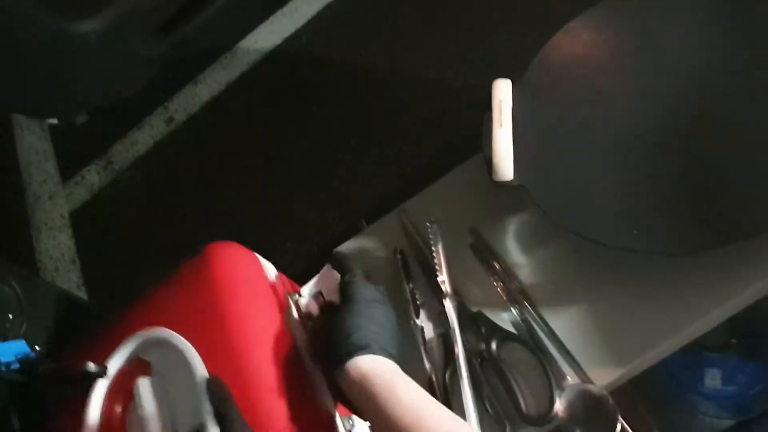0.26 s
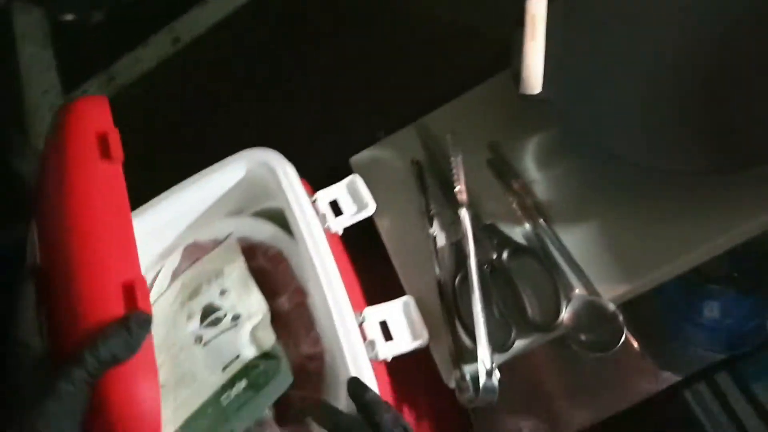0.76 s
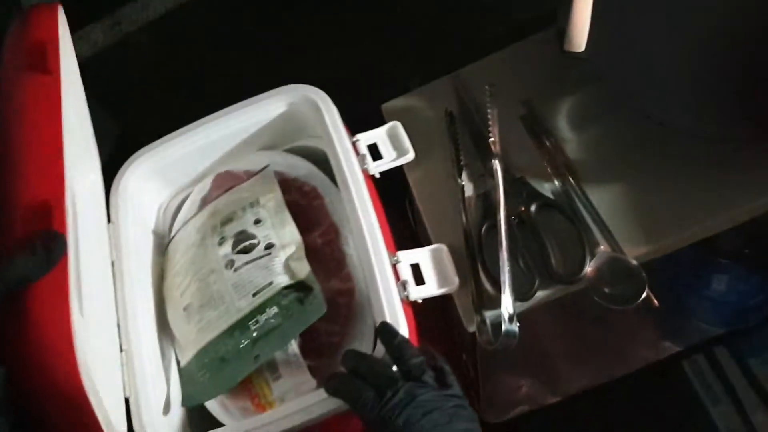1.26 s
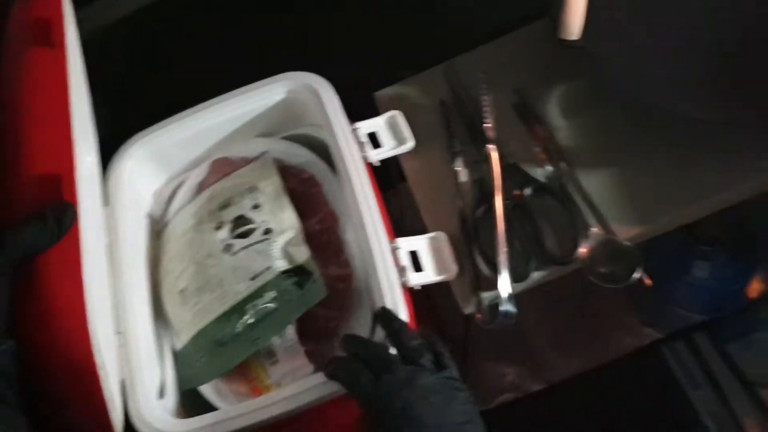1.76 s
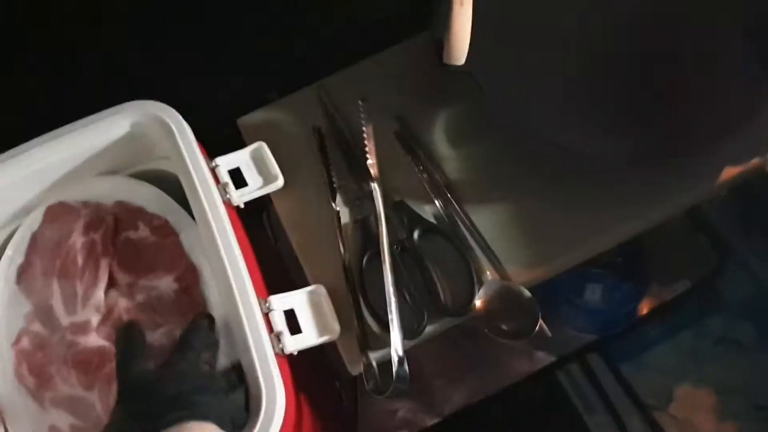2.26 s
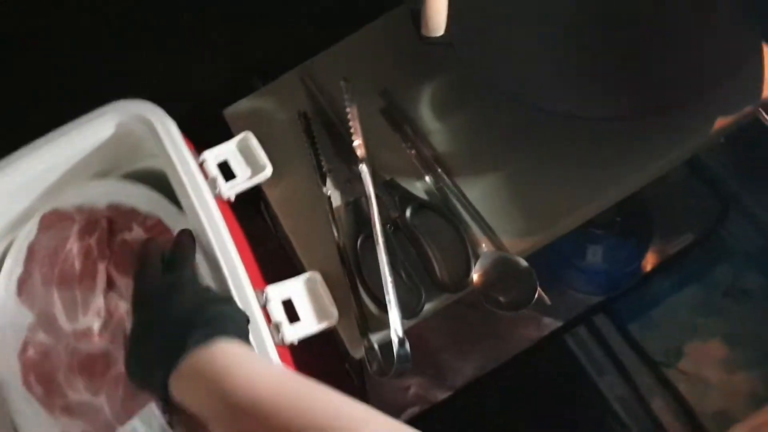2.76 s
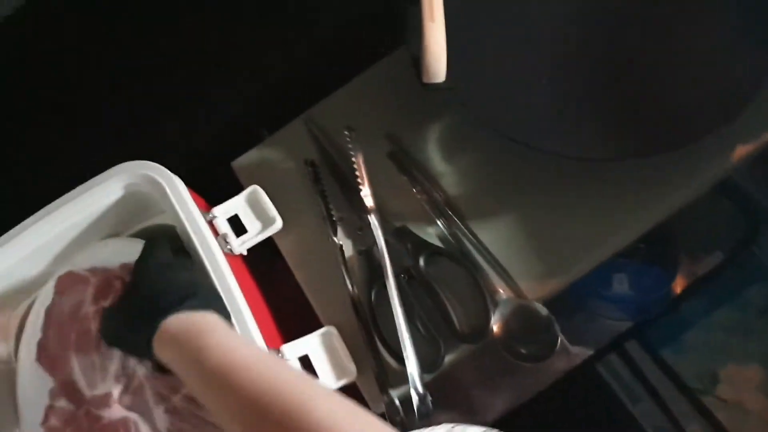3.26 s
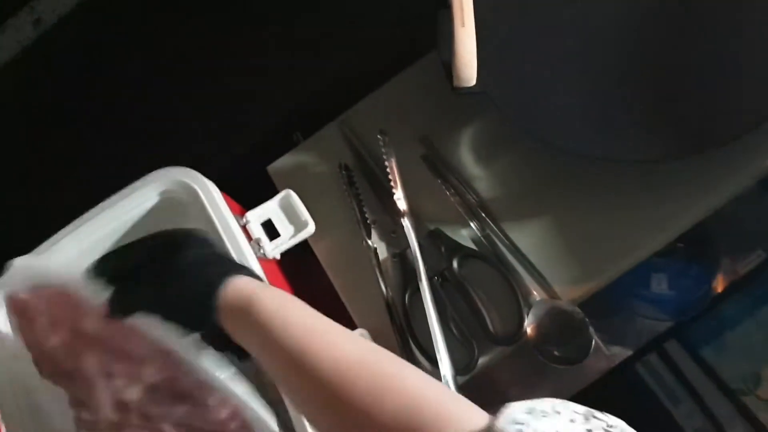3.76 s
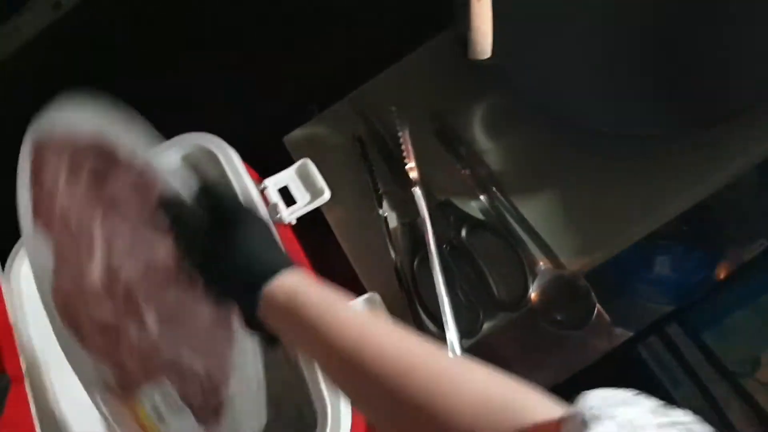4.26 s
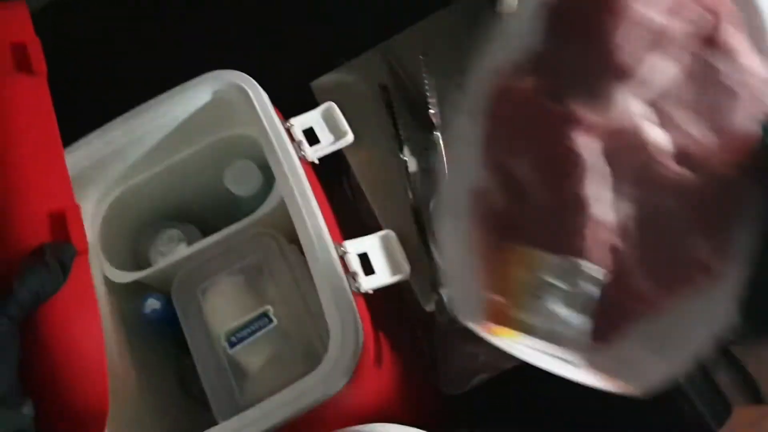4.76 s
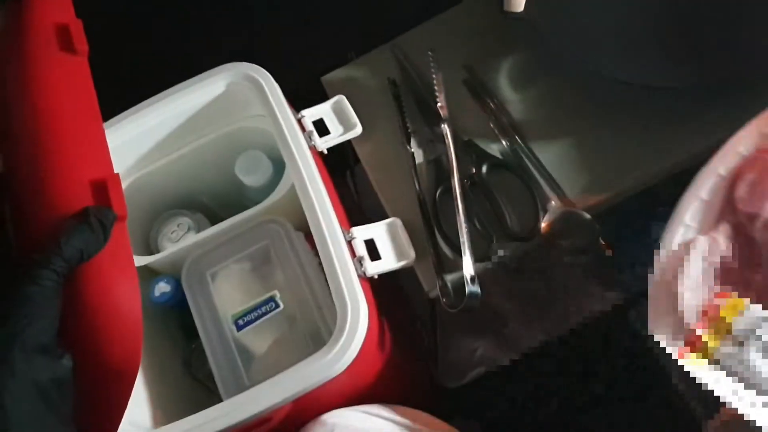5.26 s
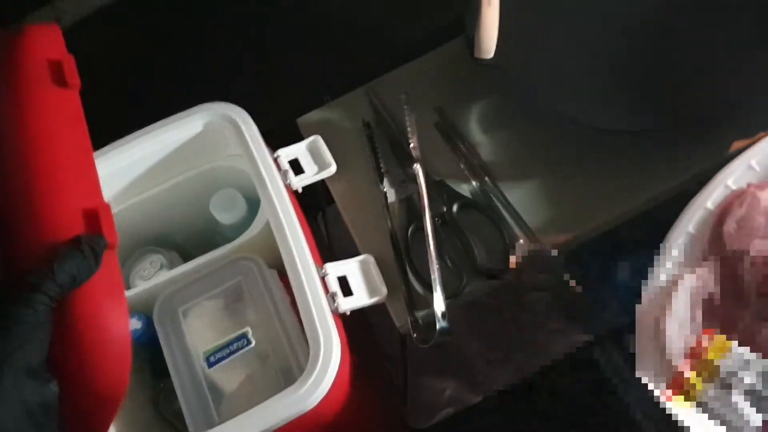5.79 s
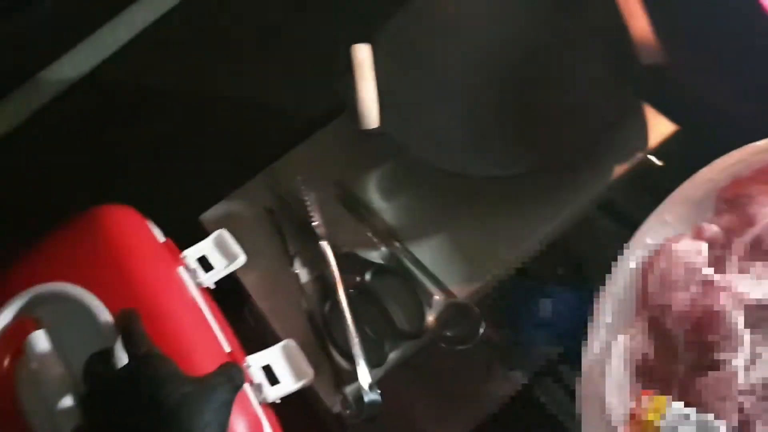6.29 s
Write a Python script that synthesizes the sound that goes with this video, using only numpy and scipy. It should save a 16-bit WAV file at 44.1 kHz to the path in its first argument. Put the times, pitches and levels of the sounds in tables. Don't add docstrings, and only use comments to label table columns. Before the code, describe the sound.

Close-up handling over low rumble and thin hiss. Hard plastic latches snap, and the hollow box thuds as it opens. A tiny film crease pops, air puffs bump the left side, then foam scrapes in jerky slips that quicken into two dry squeaky creaks. Scattered knocks follow as the tray clears the rim. Near-silence, then the lid drops with a boxy thud and clatter. The enclosed space is dry, with a brief tight echo.

```python
import sys
import numpy as np
from scipy import signal
from scipy.fft import rfft, irfft, next_fast_len
from scipy.io import wavfile
from scipy.ndimage import uniform_filter1d, map_coordinates

SR = 44100
rng = np.random.default_rng(int(sys.argv[2]) if len(sys.argv) > 2 else 0)


def master_out(mix):
    frames = np.transpose(np.atleast_2d(mix))
    ceiling = np.clip(frames, -1, 1)
    pcm = np.round(ceiling * 32767).astype(np.int16)
    wavfile.write(sys.argv[1], SR, pcm)


def volts_from_decibels(level):
    exponent = np.asarray(level, float) / 20
    return 10 ** exponent


N = 287973
LATE_S = 0.0011


def unit(x):
    return x / np.sqrt(np.mean(x ** 2) + 1e-20)


def along(points, hz):
    f, value = np.transpose(points)
    return np.interp(np.log(hz + 1), np.log(f + 1), value)


def over_time(rows):
    s, value = np.transpose(rows)
    return np.interp(np.arange(N) / SR, s, value)


def wobble(rate_hz):
    points = rng.standard_normal(int(N * rate_hz / SR) + 4)
    return map_coordinates(points, [np.arange(N) * rate_hz / SR])


def filtered(x, response):
    m = next_fast_len(N + SR // 2)
    return irfft(rfft(x, m) * response(np.fft.rfftfreq(m, 1 / SR)), m)[..., :N]


def band(f, low_hz, high_hz):
    up, down = 1j * f / low_hz, 1j * f / high_hz
    low_cut = up * up / (1 + np.sqrt(2) * up + up * up)
    return low_cut / (1 + np.sqrt(2) * down + down * down)


# pitch_hz, likeness (1 = same, -1 = opposite)
LIKENESS = [(60, 1), (130, 0.94), (290, 0.91), (640, 0.46), (1410, -0.27), (3100, 0.073), (6820, -0.11),
            (15000, 0.67)]


def rush(spectrum, patchy_db):
    z = signal.stft(rng.standard_normal((2, N)), nperseg=512)[2]
    patches = uniform_filter1d(rng.standard_normal(z.shape[1:]), 6, 0)
    patches = uniform_filter1d(patches, 10, 1)
    pair = signal.istft(z * volts_from_decibels(patchy_db * unit(patches)), nperseg=512)[1][:, :N]

    def color_and_width(hz):
        turn = np.arccos(np.clip(along(LIKENESS, hz), -1, 1)) / 2
        return volts_from_decibels(along(spectrum, hz)) * [np.cos(turn), np.sin(turn)]

    mid, side = filtered(pair, color_and_width)
    return unit(np.array([mid + side, mid - side]))


def fading(rows, soft_t60_s, ratio):
    return [(*row, soft_t60_s * ratio ** ((row[1] + 40) / 20)) for row in rows]


def contacts(rows, modes, lags, pan_db, rise_s, snap_db, apart, grain_db, flat_db, trims_db, top_hz):
    part_snap_db, part_t60, part_apart = (7.5, 2, -1), (0.95, 1.07, 0.9), (0.82, 1.7, 2.5)
    push = np.hanning(5)[1:-1] / 2
    trains, t = np.zeros((3, 2, N + SR)), np.arange(SR // 8) / SR
    for s, db, knock_db, sizzle_db, t60 in rows:
        shared, left, right, grain = rng.standard_normal((4, len(t)))
        swell = volts_from_decibels(grain_db * unit(uniform_filter1d(grain, size=40)))
        swell *= np.cos(4 * np.pi * t) * (1 - np.exp(-t / rise_s))
        lean_db = pan_db + 1.5 * rng.standard_normal()
        sides = volts_from_decibels(lean_db * np.array([0.5, -0.5]))
        start = round((s + LATE_S) * SR)
        levels_db = np.array([knock_db, 0, sizzle_db]) + trims_db + db
        for part, level_db in enumerate(levels_db):
            own = apart * part_apart[part]
            fade = volts_from_decibels(-60 * t / np.clip(t60 * part_t60[part], 0.01, 0.2))
            pair = swell * fade * (shared + own * np.array([left, right]))
            pair *= np.sqrt((1 + apart ** 2) / (1 + own ** 2))
            pair[:, :len(push)] -= volts_from_decibels(snap_db + part_snap_db[part]) * push
            gains = volts_from_decibels(level_db) * sides
            trains[part, 0, start:][:len(t)] += gains[0] * pair[0]
            trains[part, 1, start + lags[part]:][:len(t)] += gains[1] * pair[1]

    def ringing_parts(f):
        ring = volts_from_decibels(flat_db)
        for k, (c, w, db) in enumerate(modes):
            ring = ring + (-1) ** k * volts_from_decibels(db) * 1j * f * w / (c * c - f * f + 1j * f * w)
        parts = np.array([band(f, 420, 1570), band(f, 1150, 6000), band(f, 7000, 16000)])
        return ring * parts[:, None] / (1 + (f / top_hz) ** 80)

    return filtered(trains[..., :N], ringing_parts).sum(axis=0)


# pitch_hz, level_db (per Hz)
RUMBLE_COLOR = [(15, -65), (25, -43), (41, -13.5), (59, 0.5), (75, -1.5), (91, -16), (160, -19.5),
                (210, -45), (350, -120)]
BODY_COLOR = [(53, -47), (90, -2.5), (225, -4), (401, -14), (479, -13.5), (883, -18), (1010, -24),
              (1500, -26.5), (1950, -31.5), (3300, -120)]
HISS_COLOR = [(710, -19.5), (1200, -1.5), (2010, -2), (2820, -6.5), (7660, -18), (9130, -17.5),
              (13100, -24.5), (14200, -13), (16500, -45)]
# start_s, effort_db
HAND_EFFORT = [(0, -53), (.42, -49.5), (.95, -47.5), (1.3, -43.5), (1.62, -46), (1.93, -47.5),
               (2.35, -49.5), (2.6, -50.5), (2.84, -48.5), (3.15, -45.5), (3.4, -44.5), (3.6, -40.5),
               (3.85, -47.5), (4.07, -49.5), (4.4, -55), (5.3, -58.5), (5.75, -55.5), (6.53, -52.5)]
# start_s, rubbing_db
RUBBING_PACE = [(0, -71.5), (.25, -70), (.9, -67), (1.18, -70.5), (1.89, -67.5), (2.78, -71.5),
                (3.27, -65.5), (3.37, -56.5), (3.5, -55), (3.68, -62.5), (3.8, -48), (3.95, -66),
                (4.1, -63.5), (4.3, -77.5), (4.8, -82.5), (5.5, -84.5), (6.3, -73), (6.53, -78.5)]


def air():
    effort_db = over_time(HAND_EFFORT) + 50
    rubbing_db = over_time(RUBBING_PACE) + 68
    rumble_db = -46.5 + 0.93 * effort_db + 1.3 * wobble(11)
    rumble = volts_from_decibels(rumble_db) * rush(RUMBLE_COLOR, patchy_db=-1.5)
    body_db = -46.5 + 0.92 * effort_db + 1.4 * wobble(12)
    body = volts_from_decibels(body_db) * rush(BODY_COLOR, patchy_db=1.6)
    hiss = volts_from_decibels(-57 + 0.64 * rubbing_db) * rush(HISS_COLOR, patchy_db=0.5)
    return volts_from_decibels(np.array([[1], [-1]])) * (rumble + body + hiss)


# pitch_hz, level_db (per Hz)
FILM_COLOR = [(1760, -36.5), (3000, -0.5), (3590, -11.5), (7800, 3.5), (8440, -18), (10200, -2.5),
              (13900, -10.5), (15800, -32), (16500, -55.5)]


def rustle():
    level_db = over_time(RUBBING_PACE) + 0.5
    grains = volts_from_decibels(2 * wobble(65) + 2.5 * wobble(400))
    return volts_from_decibels(level_db) * unit(grains * rush(FILM_COLOR, patchy_db=1))


# start_s, peak_db, knock_db, sizzle_db
LATCH_CLICKS = [(0.1386, -46, 3, -5), (0.1644, -49, 5, -17), (0.2848, -44, 0.5, -16),
                (0.4108, -23.5, -8.5, -31), (0.4748, -49, 2, -20), (0.4868, -30, -4, -20),
                (0.5745, -35, -4, -14), (0.5781, -27.5, -5, -28), (0.6504, -34, -21, -24),
                (0.7078, -39.5, 1.5, -9.5), (0.7223, -40, -27, -12), (1.1009, -41, -17, -4),
                (1.2271, -37, -6, -8), (1.273, -34.5, -3, -14), (1.3069, -46.5, 0, -11),
                (1.3688, -44, -12, -34), (1.4047, -58, 10, -7), (1.449, -25.5, -4, -22),
                (1.464, -28, -16, -18), (1.5683, -44, -18, -20), (2.2994, -57, -4, 4),
                (2.4074, -28.5, -8.5, 0), (2.4015, -47, -9, 6), (1.4705, -32.5, -10, -16),
                (.4175, -33.5, -3.5, -25), (2.5174, -56, 4, 11), (2.5466, -38.5, -6, 1),
                (5.465, -57.5, -4, -20), (5.7857, -53.5, -3, -17), (5.8077, -51, -14, -19),
                (6.3198, -16, -14, -23)]
# start_s, peak_db, knock_db, sizzle_db
LID_RATTLES = [
    (6.2886, -29, 1, -10),
    (6.3125, -30, -16, -5),
    (6.3394, -32.5, -3, -5),
    (6.3644, -47, 3, 2),
    (6.3869, -48.5, 2, 3),
]
# pitch_hz, width_hz, level_db
BOX_RESONANCES = [(700, 2080, 1), (2170, 8800, -8), (2620, 360, -10.5), (7800, 260, -0.5)]


def box():
    clicks = fading(LATCH_CLICKS, soft_t60_s=0.065, ratio=0.56)
    rattles = fading(LID_RATTLES, soft_t60_s=0.24, ratio=0.5)
    return contacts(clicks + rattles, BOX_RESONANCES, lags=(13, 12, 20), pan_db=4, rise_s=0.00045,
                    snap_db=18.5, apart=0.97, grain_db=3.0, flat_db=-5.0,
                    trims_db=[6, -1.5, 1.5], top_hz=14900)


# start_s, peak_db, pitch_hz, t60_s
WALL_KNOCKS = [(0.163, -37, 378, 0.064), (0.411, -27, 252, 0.11), (0.486, -31.5, 237, 0.13),
               (0.574, -20.5, 470, 0.04), (0.677, -31.5, 456, 0.14), (0.709, -30, 462, 0.1),
               (0.728, -22, 203, 0.033), (1.111, -25.5, 215, 0.083), (1.231, -19, 214, 0.034),
               (1.27, -34, 130, 0.064), (1.377, -22.5, 112, 0.059), (1.403, -23.5, 452, 0.057),
               (1.451, -16.5, 214, 0.058), (1.481, -23, 117.4, 0.19), (1.77, -37, 251, 0.12),
               (5.78, -39, 108, 0.11), (6.33, -13, 113, 0.054), (6.36, -28, 160, 0.11),
               (3.203, -32, 170, 0.39), (3.393, -29, 105.5, 0.28), (3.544, -10, 162, 0.021),
              (3.739, -22.5, 285, 0.13), (3.807, -20.5, 241, 0.038), (3.846, -23, 188, 0.032),
              (3.992, -32, 412, 0.079), (4.019, -22.5, 108, 0.039), (4.22, -14.5, 262, 0.039),
              (4.3975, -34.5, 336, 0.057), (6.2943, -10, 284, 0.037), (6.2994, -9, 122, 0.058),
              (6.322, -21, 484, 0.04), (6.324, -32, 726, .04), (1.305, -28.5, 330, 0.047),
              (.53, -41, 600, 0.054), (.445, -37, 427, 0.084), (3.476, -27, 420, .016),
              (3.4895, -25, 420, .016), (3.508, -23, 420, 0.019), (3.5355, -24, 420, .016),
              (6.36, -38.5, 1134, 0.18), (6.419, -46, 2100, 0.027), (1.24, -29.5, 423, 0.044),
              (1.33, -33, 298, .07)]
# start_s, peak_db, pitch_hz, t60_s
SHORT_RINGS = [(0.411, -31.5, 912, 0.068), (0.487, -36, 830, 0.043), (0.721, -51, 604, 0.032),
               (1.273, -22.5, 515, 0.027), (1.405, -22, 666, 0.016), (1.451, -24, 700, 0.039),
               (1.464, -17.5, 554, 0.024), (2.407, -44, 617, 0.012), (3.876, -25, 1960, 0.024),
               (3.986, -23.5, 630, 0.026), (4.011, -16.5, 800, 0.0081), (4.226, -26, 2120, 0.016),
               (4.397, -37.5, 609.4, 0.035), (6.288, -23.5, 819, 0.019), (6.322, -21, 2040, 0.016),
               (4.222, -23.5, 1600, 0.021),
    (6.288, -17.5, 1487, 0.015),
    (6.388, -34, 1550, 0.041),
    (4.2, -26, 1315, 0.02),
    (3.852, -28, 550, 0.026),
]
# pitch_hz, level_db, t60_s
LID_TONES = [(60.2, -8, 0.29), (105.3, -11.5, 0.3), (139, 8, 0.045), (193, -11, 0.094), (296.7, -7.5, 0.13),
             (470, -12, 0.051)]


def thumps():
    lags = (12, 22)
    out, t = np.zeros((2, N + SR)), np.arange(SR // 4) / SR
    for s, db, hz, t60 in WALL_KNOCKS + SHORT_RINGS:
        near = rng.uniform(0.72, 1.35, 2)
        neighbors = np.sin(2 * np.pi * hz * np.outer(near, t)).sum(axis=0)
        ring = np.sin(2 * np.pi * hz * t) + 0.35 * neighbors
        fade = volts_from_decibels(db - 60 * t / np.clip(t60, 0.015, 0.3))
        row = out[int(hz > 1200), round((s + LATE_S) * SR):]
        row[:len(t)] += fade * (1 - np.exp(-t * hz / 0.57)) * ring
    lid = sum(volts_from_decibels(db - 60 * t / t60) * np.sin(2 * np.pi * hz * t) for hz, db, t60 in LID_TONES)
    landing = round(6.2865 * SR)
    out[0, landing:][:len(t)] += volts_from_decibels(-4.5) * (1 - np.exp(-t / 0.0039)) * lid
    pair = np.array([sum(out), sum(map(np.roll, out, lags))])
    return volts_from_decibels(np.array([[1.5], [-1.5]])) * pair[:, :N]


# start_s, length_s, low_hz, high_hz,
# level_db
SOFT_BRUSHES = [(.895, .06, 3000, 5200, -58), (.9, .17, 800, 1080, -52), (2.75, .09, 6000, 10000, -64),
                (2.87, .07, 4500, 11000, -63), (3.15, .14, 6500, 14000, -56), (5.8, .14, 3200, 13000, -68),
                (2.407, .03, 7500, 11800, -46), (2.97, .12, 6000, 13000, -64), (3.42, .17, 940, 4500, -48),
                (3.38, .24, 450, 950, -41), (3.5, .245, 200, 400, -34), (6.31, .12, 600, 5500, -47),
                (6.37, .11, 500, 2600, -50), (3.44, .12, 1200, 4300, -50), (3.97, .07, 900, 2400, -44),
                (3.84, .06, 900, 2400, -47), (.49, .07, 900, 3500, -58), (4.39, .03, 900, 2600, -54),
                (4.219, .03, 1200, 3600, -42), (6.285, .06, 1200, 2600, -44)]


def brushes():
    out = np.zeros((2, N))
    for s, length, low_hz, high_hz, db in SOFT_BRUSHES:
        n = round(length * SR)
        shape = signal.butter(2, [low_hz, high_hz], "band", fs=SR, output="sos")
        shared, *own = rng.standard_normal((3, SR // 4))
        noise = unit(signal.sosfilt(shape, shared + own))[:, :n]
        out[:, round(s * SR):][:, :n] += volts_from_decibels(db) * np.hanning(n) * noise
    return out


# start_s, length_s, pitch_hz, rise_hz, level_db
HINGE_SQUEAKS = [(.84, 0.14, 10500, -48, -66), (1.663, 0.054, 12700, 300, -67), (1.725, .03, 13300, 2, -68),
                 (1.1, .02, 7900, 0, -56.5), (1.103, 0.024, 3950, 0, -56), (1.175, .02, 7800, 0, -73),
                 (1.226, 0.0093, 7800, 4, -46), (1.227, 0.0089, 4330, 0, -49), (1.3, 0.014, 4200, 0, -57),
                 (1.365, 0.011, 7800, 0, -58), (2.513, 0.015, 7800, -2, -54)]


def squeaks():
    out, t, waver = np.zeros(N), np.arange(N) / SR, wobble(70)
    for s, length, hz, rise, db in HINGE_SQUEAKS:
        u = np.clip((t - s) / length, 0, 1)
        pitch = hz + rise * u + 110 * wobble(380)
        whistle = np.sin(2 * np.pi * np.cumsum(pitch) / SR)
        out += volts_from_decibels(db + 5 * waver[::-1]) * np.sin(np.pi * u) * whistle
    return out


# start_s, peak_db, pitch_hz,
# t60_s
HIGH_TICKS = [
    (2.4203, -27.5, 9960, 0.014),
    (2.4142, -34, 10800, .015),
    (2.4245, -41, 9600, .015),
    (2.436, -44, 9800, 0.018),
    (3.3993, -12, 9800, 0.0055),
    (3.3994, -16.5, 12500, .006),
    (3.7675, -28, 10970, 0.014),
]


def ticks():
    out, t = np.zeros(N), np.arange(SR // 40) / SR
    for s, db, hz, t60 in HIGH_TICKS:
        shape = volts_from_decibels(db - 60 * t / t60) * (1 - np.exp(-t / 0.00059))
        out[round((s + LATE_S) * SR):][:len(t)] += shape * np.sin(2 * np.pi * hz * t)
    return volts_from_decibels(np.array([[4], [-5]])) * out


# start_s, peak_db, pitch_hz
AIR_PUFFS = [(2.958, -27, 90), (2.974, -24, 70), (3.009, -22.5, 90), (3.024, -21, 65), (3.0455, -15.5, 85),
             (3.0342, -22, 130), (3.0701, -16.5, 190), (3.0807, -9, 163), (3.093, -17.5, 110),
             (3.113, -28, 120), (3.137, -26, 190), (3.159, -23, 119)]


def puffs():
    half = SR // 20
    out, t = np.zeros((2, N)), np.arange(-half, half) / SR
    for s, db, hz in AIR_PUFFS:
        shape = np.exp(-(t * hz / 0.5) ** 2)
        out[0, round(s * SR) - half:][:len(t)] -= volts_from_decibels(db) * np.sin(2 * np.pi * hz * t) * shape
    return out


# start_s, peak_db, knock_db, sizzle_db
TRAY_SLIPS = [(3.1854, -54, 3, 4), (3.3154, -38.5, -5, -6.5), (3.3338, -30.5, -8.5, -4),
              (3.3594, -38, -7.5, 1.5), (3.3802, -16, -33.5, -8.5), (3.399, -9.5, -15, -6.5),
              (3.4249, -15, -12, -9), (3.4334, -23.5, 1.5, -14), (3.4441, -18.5, -5.5, -12.5),
              (3.4755, -20, -18, -14.5), (3.4884, -26.5, 2.5, -15), (3.5074, -20.5, -6, -17),
              (3.5204, -30, 2.5, -14), (3.5349, -25.5, 4, -12.5), (3.5613, -7, -16, -35.5),
              (3.5793, -4.5, -7, -16), (3.6022, -4, -4.5, -24.5), (3.6202, -4, -3.5, -14),
              (3.6334, -7.5, -1, -20.5), (3.6539, -6, -2.5, -15.5), (3.6616, -4, -7, -20.5)]
# start_s, peak_db
TRAY_CREAKS = [(3.6689, -1.5), (3.6739, -2), (3.6785, -3.5), (3.6828, -3), (3.6862, -2), (3.6904, 0),
               (3.695, -1), (3.699, -11.5), (3.7017, -14), (3.7054, -19), (3.7439, -6.5), (3.7468, -4.5),
               (3.75, -5), (3.7556, -11), (3.7595, -17)]
# start_s, peak_db, knock_db, sizzle_db
TRAY_BUMPS = [(3.7385, -6, -2, -25), (3.7674, -9.5, -9.5, -10.5), (3.7794, -24, -5, -13),
              (3.8114, -33, 0, -2), (3.8496, -21.5, -2.5, -11.5), (3.8766, -21, -9, -14),
              (3.9044, -35, 2.5, -7), (3.9158, -38, -4, -10), (3.9494, -31.5, -9, -7.5),
              (3.9754, -33, -6, -8), (3.9858, -19, -1.5, -13), (3.9988, -14.5, -5.5, -13),
              (4.0104, -20.5, -11, -15), (4.0654, -35, -4.5, -11), (4.1185, -42, 1, 1.5),
              (4.1664, -47, 12.5, 4), (4.1905, -29, -12, -10), (4.1934, -22.5, -15, -8),
              (4.1985, -26, -11, -10), (4.2218, -14.5, -13.5, -14.5), (4.3969, -46.5, 2, -22)]
# pitch_hz, width_hz, level_db
TRAY_RESONANCES = [(456, 90, -4.5), (800, 179, 4), (970, 200, 2), (1500, 860, -2.5), (1930, 230, 1.5),
                   (2240, 110, 2), (3100, 1040, 0.2), (3896, 240, -4.5), (4200, 140, -14),
                   (5470, 280, -4.5), (6370, 1300, -5), (12500, 12000, -3.5)]


def tray():
    creaks = [(s - LATE_S, db, -8, -18) for s, db in TRAY_CREAKS]
    rows = fading(TRAY_SLIPS, soft_t60_s=0.058, ratio=0.96)
    rows += fading(TRAY_BUMPS, soft_t60_s=0.068, ratio=0.79)
    rows += fading(creaks, soft_t60_s=0.04, ratio=1)
    x = contacts(rows, TRAY_RESONANCES, lags=(12, 7, 21), pan_db=3, rise_s=0.00024,
                 snap_db=25, apart=0.8, grain_db=2, flat_db=-19,
                 trims_db=[-0.6, -8.5, 3], top_hz=15750)
    return filtered(x, lambda f: 1 - 0.7 * np.exp(-((f - 8640) / 350) ** 2))


# pitch_hz, t60_s
CABIN_ECHO = [(150, 0.072), (1500, 0.049), (10000, 0.027)]


def cabin(x):
    hz, t, z = signal.stft(rng.standard_normal((2, SR // 4)), SR, nperseg=256)
    fade = volts_from_decibels(-60 * t / along(CABIN_ECHO, hz)[:, None])
    tail = signal.istft(z * fade, SR, nperseg=256)[1]
    late = np.pad(x, ((0, 0), (150, 0)))
    return signal.fftconvolve(late, tail / np.linalg.norm(tail[0]), axes=1)[:, :N]


def quiet_top(f):
    return (1 + 0.5 * np.exp(-((f - 14350) / 200) ** 2)) * (f < 14650)


def scene():
    low_blows = filtered(thumps(), lambda f: band(f, 36, 9000))
    near = box() + tray() + ticks() + low_blows
    room = volts_from_decibels(-9.0) * filtered(cabin(near), lambda f: band(f, 260, 19000))
    quiet = filtered(brushes() + rustle() + air(), quiet_top)
    return near + room + puffs() + squeaks() + quiet


def top_cut(x):
    return signal.sosfilt(signal.butter(12, 16650, fs=SR, output="sos"), x)


def record(dry):
    x = filtered(dry, lambda f: band(f, 26, 18000))
    mix = x / (1 + np.abs(x / 0.86) ** 8) ** (1 / 8)
    return top_cut(mix)


dry = scene()
out = record(dry)
master_out(out)
```